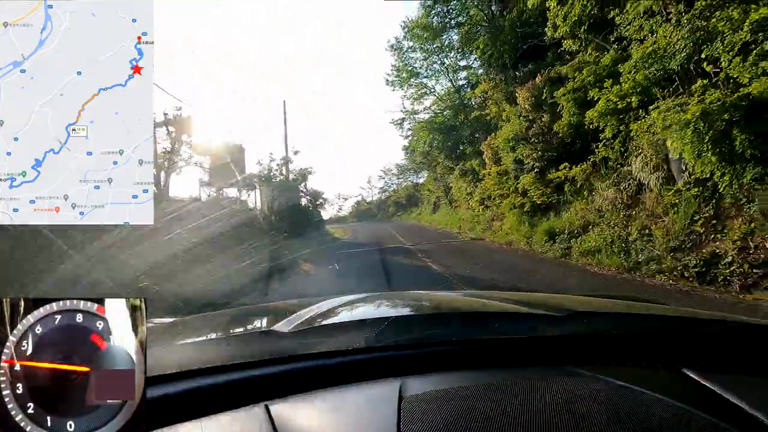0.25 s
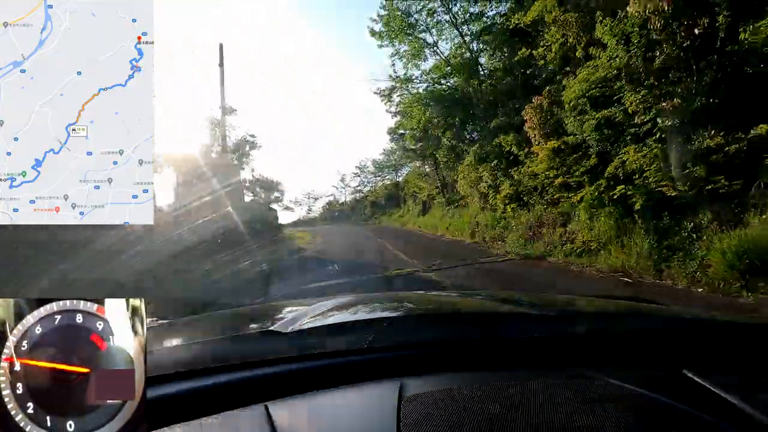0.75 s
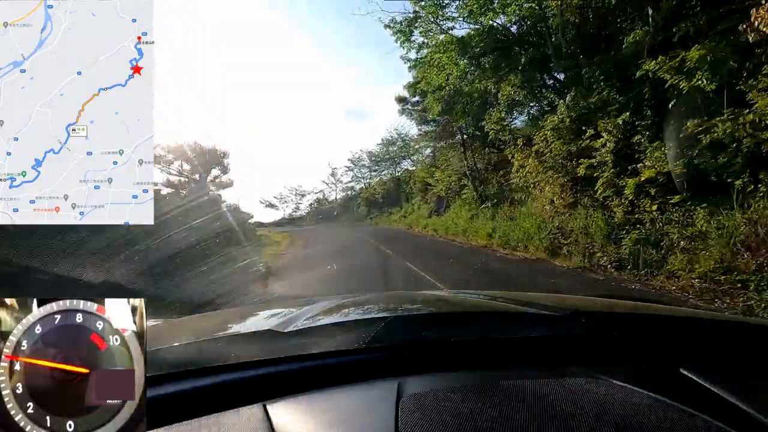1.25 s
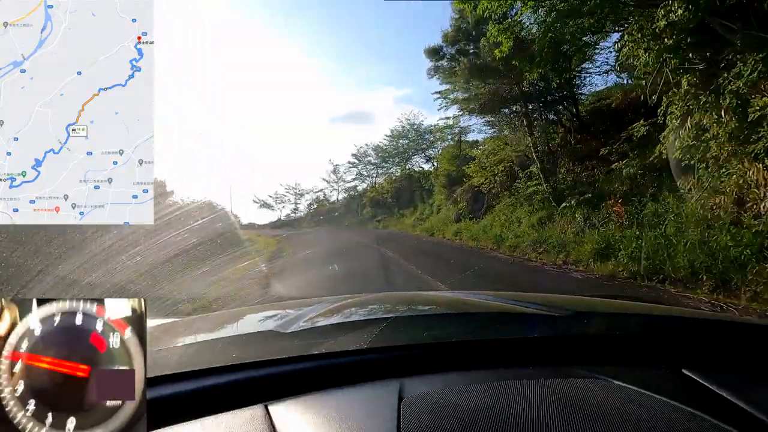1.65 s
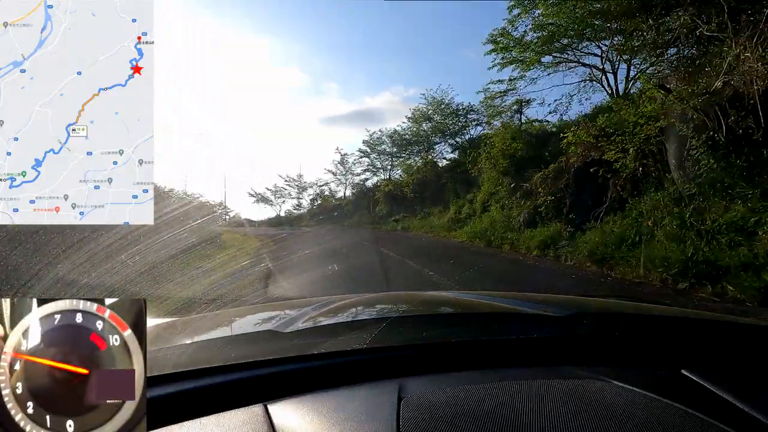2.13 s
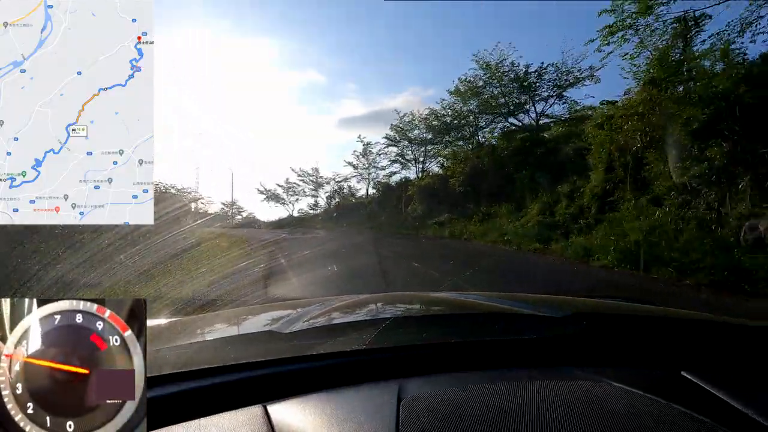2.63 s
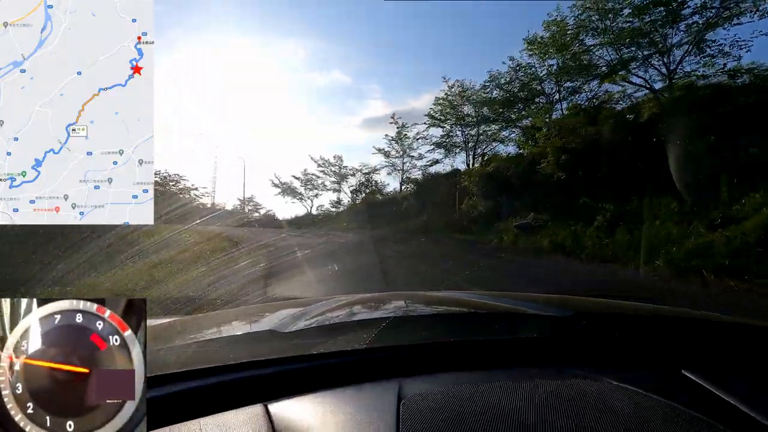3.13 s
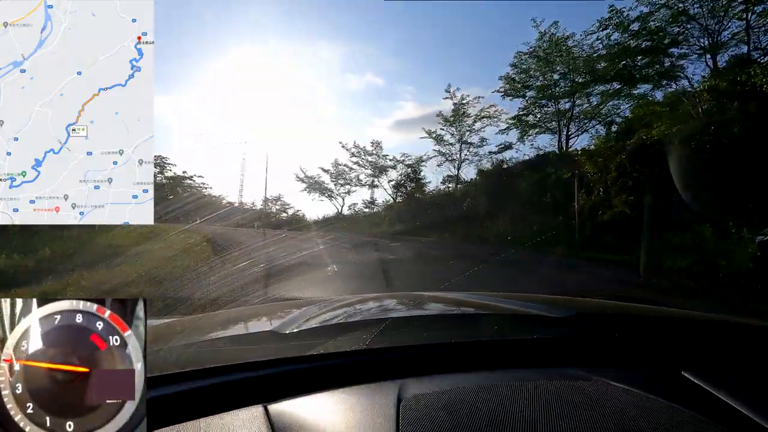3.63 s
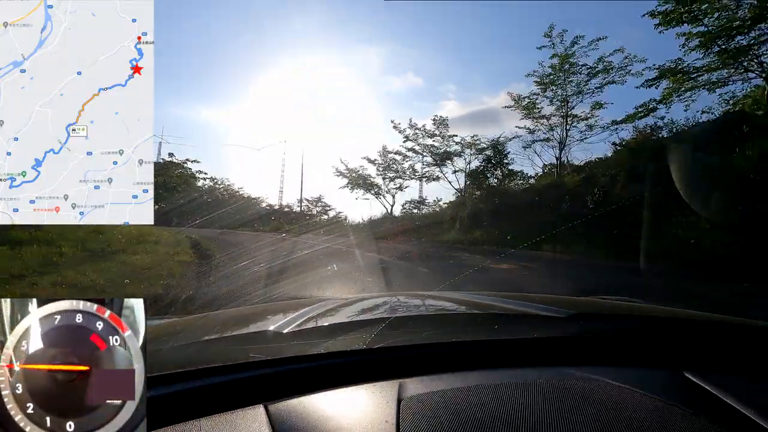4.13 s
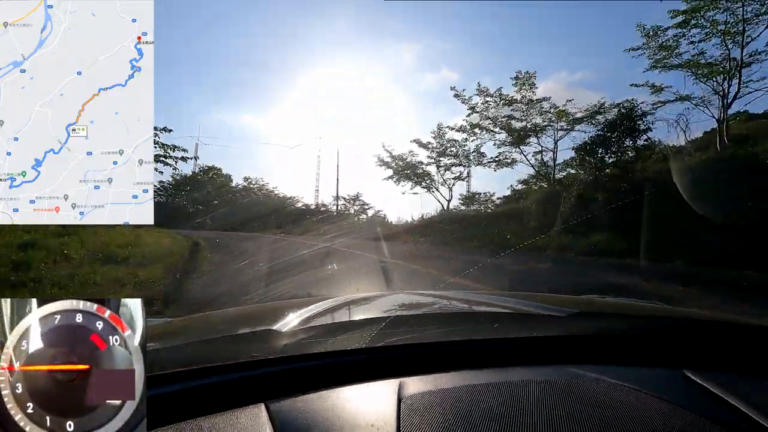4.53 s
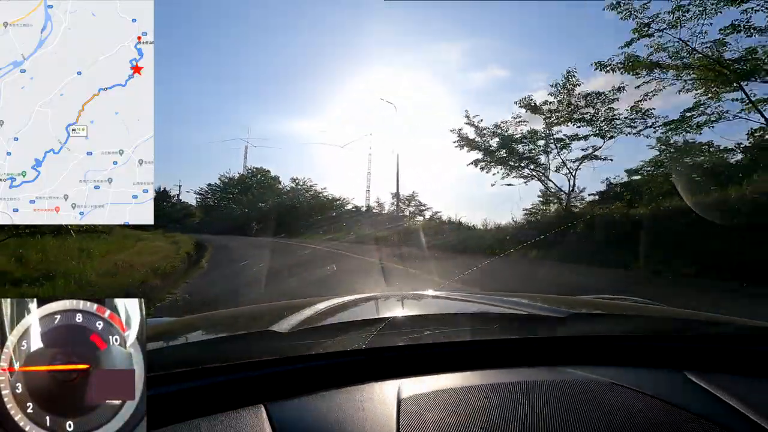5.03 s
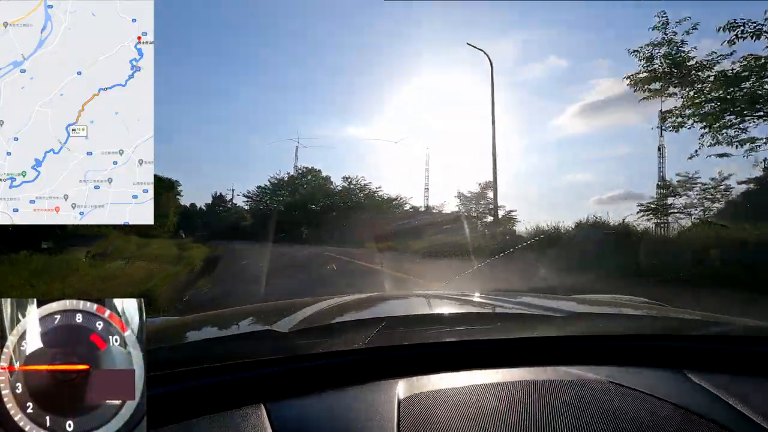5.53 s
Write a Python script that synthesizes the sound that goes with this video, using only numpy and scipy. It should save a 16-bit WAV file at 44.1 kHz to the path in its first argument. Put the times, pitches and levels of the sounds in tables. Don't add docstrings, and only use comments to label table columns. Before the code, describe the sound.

Inside a sports car on a hill road, a rotary engine drones with a buzzy edge and throbbing exhaust roar. It climbs slightly, jolts and lifts off after two seconds, booms deeply around four, then pulls again. Rumbling bumps, small trim knocks and grit ticks surround a close dashboard microphone overloaded by bass.

```python
import sys
import numpy as np
from scipy import signal
from scipy.fft import rfft, irfft, next_fast_len
from scipy.io import wavfile
from scipy.ndimage import uniform_filter1d

SR = 44100
rng = np.random.default_rng(int(sys.argv[2]) if len(sys.argv) > 2 else 0)


def output_pcm(signal):
    pcm = np.clip(np.atleast_2d(signal).T, -1, 1) * 32767
    wavfile.write(sys.argv[1], SR, np.round(pcm).astype(np.int16))


def makeup_ratio(level_db):
    decades = np.asarray(level_db, float) / 20
    return 10 ** decades


N = 254898
T = np.arange(N) / SR

# time in seconds, firing rate in Hz.
FIRING_RATE = [(0.0, 130.0), (.6, 133.9), (1.55, 139.6), (2.0, 140.2), (2.24, 139.2), (2.62, 136.3),
               (2.89, 134.8), (3.3, 133.0), (3.45, 131.4), (3.6, 128.3), (3.85, 126.0), (4.15, 122.2),
               (4.4, 119.7), (5.0, 119.6), (5.3, 121.4), (5.78, 124.0)]
# time in seconds, throttle 0-1, load on tyres and exhaust 0-1.
PEDAL = [(0.0, 0.74, 1), (.36, 1.01, 0.96), (.75, 0.83, 0.94), (1.45, 0.93, 0.96), (1.72, 0.72, 0.94),
         (2.0, 0.7, 0.53), (2.3, 0.29, 0.22), (2.4, 0.06, 0.18), (2.62, 0.24, 0.43), (3.1, 0.73, 0.67),
         (3.3, 0.38, 0.56), (3.45, 0.24, 0.43), (3.75, .4, .22), (4.25, 0, 0.16), (4.45, 0.2, 0.29),
         (4.65, 0.68, 0.68), (5.3, 0.98, 0.99), (5.78, 0.85, .95)]
# start in seconds, length in seconds, swing in Hz, period in seconds.
SHUNTS = [
    (1.612, .42, 3.6, .27),
    (4.35, 1.0, -1.6, .335),
]
# level at full throttle in dB, loss as the throttle shuts
# (factor on the throttle in dB), pipe mode in Hz, its width in Hz, its lift in dB.
FIRST_ORDER = (-12.5, 0.96, 120, 18.5, 0.5)
SECOND_ORDER = (-29.5, 0.65, 241.5, 25.5, 15.5)
FIFTH_ORDER = (-56, 0.7, 605.5, 40.5, 33.5)
# multiple of the firing rate, level pulling at high revs in dB, coasting in dB,
# pulling at low revs in dB.
UPPER_ORDERS = [(1.5, -35.5, -35, -38), (2.5, -39.5, -45.5, -31), (3, -36, -33.5, -40.5),
                (3.5, -45.5, -38.5, -50.5), (4, -37.5, -40.5, -35), (4.5, -35.5, -29.5, -52.5),
                (5.5, -35, -35.5, -48.5), (6, -34.5, -37, -34.5), (6.5, -38, -40.5, -39),
                (7, -35.5, -39, -44), (7.5, -37, -35.5, -36.5), (8, -56.5, -51, -37),
                (8.5, -42.5, -42.5, -40), (9, -44.5, -55, -50), (9.5, -34, -39.5, -39.5),
                (10, -39.5, -56, -41), (10.5, -34.5, -39.5, -34), (11, -48, -60, -43),
                (11.5, -38, -63.5, -36.5), (12, -60.5, -51.5, -36), (12.5, -65.5, -66, -40),
                (13, -63.5, -57, -45)]
# centre in seconds, length in seconds, level in dB.
BOOMS = [(.24, 0.22, -19), (0.47, 0.24, -17), (1.56, .2, -27), (2.52, 0.17, -22), (3.227, 0.34, -20),
         (3.843, 0.18, -9), (3.98, 0.46, -8.5), (4.127, 0.19, -7.5), (4.623, 0.25, -19), (5.3, 0.28, -22.5)]
# centre in seconds, length in seconds, change of
# rumble in dB, change of body boom in dB.
BUMPS = [(0.047, 0.086, 9.5, 1.5), (0.668, .2, 3.5, 2.5), (1.43, 0.29, 5, 1.5), (1.66, 0.34, 10, 3),
         (2.11, 0.22, -3, 1), (2.3, 0.81, -1, -1), (3.115, 0.067, 3.5, 2), (3.177, 0.31, 5, 2.6),
         (3.405, 0.11, 2, 6.5), (3.623, 0.12, 10, 5.5), (3.85, 0.48, 4.5, 2.5), (4.15, 0.13, 10.5, -3),
         (4.267, 0.11, -5, -4.5), (4.42, 0.11, 6, 0), (4.652, 0.088, 9.5, 3), (5.253, 0.072, 7, 4.5),
         (5.5, .12, 3, -1), (1.1, .14, 2, 1), (4.77, .12, 3, .3), (2.837, 0.18, 4.5, 2),
         (1.28, .12, 8, 1.5), (1.87, .12, -4, -6), (2.972, 0.23, 0.5, 2), (4.338, .1, 1, 3),
         (5.65, 0.29, -6, -2.5)]
# frequency in Hz, density in dB per Hz.
RUMBLE_COLOUR = [(7.1, -37.5), (12, -18), (48, 3), (65, -0.5), (87, -10), (115, -1.5), (150, -39),
                 (250, -120)]
BODY_COLOUR = [(59, -32.5), (100, 3.5), (124, -0.5), (157, -2.5), (221, -2.5), (279, -3.5), (361, -15.5),
               (408, -20.5), (520, -16), (680, -50.5), (1140, -120)]
ROAR_COLOUR = [(240, -31.5), (400, 3.5), (526, -8.5), (615, 2.5), (798, -7), (886, 1.5), (971, -1),
               (1090, -3.5), (1530, -3.5), (1900, -25.5), (2470, -47.5), (4180, -120)]
HISS_COLOUR = [(1000, -20), (1700, 1.5), (1970, 2), (2710, -3), (3300, -8), (4090, -15), (4940, -20),
               (6090, -21), (9000, -34), (11700, -61), (19800, -120)]
AIR_COLOUR = [(4710, -26), (8000, -9), (9330, -5.5), (10500, -7), (11200, -9), (13900, -13), (15100, -15.5),
              (15800, -21)]
# resonance in Hz, width in Hz, level in dB.
PANEL_MODES = [(2774, 38, -47.5), (990.3, 24, -35.5), (4010, 260, -53)]
# start in seconds, peak in dB, factor on the mode frequencies.
KNOCKS = [(0.039, -3, 1.03), (0.172, 0.5, 1.01), (0.765, -8.5, 1.3), (1.513, -12, 1.2), (2.006, -2.5, 0.93),
          (2.635, -11, 1.18), (2.988, -15, 0.89)]
# frequency in Hz, level in dB, t60 in seconds.
TRIM_MODES = [(666, -10, 0.061), (930, -2, 0.033), (1126, 0.5, 0.018), (1327, -5.5, 0.033),
              (1780, -10, 0.014), (3500, -18, .008)]
# start in seconds, peak in dB, low treble in relative dB, top treble in relative dB,
# hardness 0-1.
GRIT = [(0.0972, -40, -4, -21, 0.5), (0.15, -38, 7, -10, 0.5), (0.218, -46, 1, 3, .4),
        (0.4284, -44, 12, -18, 0.55), (0.63, -34, 2.2, -9, 0.55), (0.707, -33.5, -2, 2.5, 0.5),
        (0.8914, -36, 3, 7, 0.74), (0.9315, -16, 0, -2, 1), (1.535, -35, 15, -25.5, 0.2),
        (1.558, -25, 10, -24, 0.86), (1.5717, -29, 7, -13, 0.46), (1.5932, -33, 9, -22, 0.2),
        (1.62, -37, 5, -17, 0.3), (1.72, -33, 7, -8, 0.7), (2.672, -46.5, 11, -19, 0.6),
        (2.872, -38, 3, 0, 0.55), (2.986, -26, 2, -12, 0.85), (3.3354, -26.5, 7.5, -3, 0.67),
        (3.3494, -33, 5, -19, 0.05), (3.552, -47, 9, -4, 0.7), (3.75, -35, 5, -5, 0.8),
        (3.905, -46, 10, -13, 0.6), (4.14, -41.5, 3, -9, 0.5), (4.4497, -49, 19, -11, 0.6)]

SHAFT_DB = -30.5
UPPER_DB, UPPER_LOSS = 0.54, 0.45
SHUT_LEAK = 0.045
STUMBLE_DB = 3.5
GEAR_TEETH = 23
CASING_HZ, CASING_WIDTH_HZ, GEAR_DB = 2750, 35, -35
RUMBLE_DB, BODY_DB, ROAR_DB, HISS_DB = -17, -15, -24.5, -32
RUMBLE_RISE_DB, BODY_RISE_DB, HISS_FALL_DB = 3.7, 3.5, 10
AIR_DB, WIND_DB = -26.5, -72.5
PUFF_DEPTH = 0.36
MUFFLE = 0.66
RATTLE_SOFT_S, RATTLE_HARD_S = 0.2, 0.058


def evened(x):
    return x / np.sqrt(np.mean(x ** 2) + 1e-20)


def curves(rows):
    s, *columns = np.transpose(rows)
    return [np.interp(T, s, c) for c in columns]


def drift(hz):
    size = next_fast_len(N)
    f = np.fft.rfftfreq(size, 1 / SR)
    spectrum = rfft(rng.standard_normal(N), size)
    return evened(irfft(spectrum / (1 + (f / hz) ** 4))[:N])


def noise(colour, size, patchy_db):
    frames, hz = 4 * N // size + 6, np.fft.rfftfreq(size, 1 / SR)
    real, imaginary, patches = rng.standard_normal((frames, len(hz), 3)).T
    patches = uniform_filter1d(patches, size=8, axis=0)
    patches = evened(uniform_filter1d(patches, size=5, axis=1))
    f, db = np.transpose(colour)
    colour_db = np.interp(np.log(hz + 1), np.log(f + 1), db, left=-120, right=-120)
    spectra = (real + 1j * imaginary) * makeup_ratio(colour_db[:, None] + patchy_db * patches)
    return evened(signal.istft(spectra, nperseg=size, noverlap=3 * size // 4)[1][:N])


def band(x, lo_hz, hi_hz):
    return signal.sosfilt(signal.butter(2, [lo_hz, hi_hz], "bandpass", fs=SR, output="sos"), x)


def add(mix, s, sound):
    part = mix[round(s * SR):][:len(sound)]
    part += sound[:len(part)]


def swell(s, length):
    return np.cos(np.pi * np.clip((T - s) / max(length, 0.02), -0.5, 0.5)) ** 2


def pedal():
    return np.clip(curves(PEDAL), 0, 1.2)


def shunt():
    total = 0
    for s, length, swing_hz, period in SHUNTS:
        t = T - s
        decay = (t > 0) * np.maximum(1 - (t / length) ** 2, 0)
        total = total + swing_hz * np.sin(2 * np.pi * t / period) * decay
    return total


def order_db(hz, throttle, full_db, loss, pipe_hz, width_hz, lift_db):
    charge_db = loss * 20 * np.log10(throttle + SHUT_LEAK)
    return full_db + charge_db + lift_db / (1 + ((hz - pipe_hz) / width_hz) ** 2)


def gear_whine(hz, turns, load):
    near = 1 / (1 + ((GEAR_TEETH * hz - CASING_HZ) / CASING_WIDTH_HZ) ** 2)
    level = load * makeup_ratio(GEAR_DB + 2 * drift(16)) * near
    return level * np.cos(2 * np.pi * GEAR_TEETH * (turns + 0.0055 * drift(30)))


def engine():
    hz = curves(FIRING_RATE)[0] + shunt()
    throttle, load = pedal()
    boom = sum(makeup_ratio(db) * swell(s, length) for s, length, db in BOOMS)
    shaft_db = 20 * np.log10(makeup_ratio(SHAFT_DB) + boom)
    stumble_db = STUMBLE_DB * np.maximum(1 - throttle, 0)
    first_db = order_db(hz, throttle, *FIRST_ORDER) + stumble_db * drift(9.5)
    second_db = order_db(2 * hz, throttle, *SECOND_ORDER) + stumble_db * drift(7)
    fifth_db = order_db(5 * hz, throttle, *FIFTH_ORDER)
    upper_db = UPPER_DB + UPPER_LOSS * 20 * np.log10(throttle + SHUT_LEAK)
    turns = np.cumsum(hz * (1 + 0.00061 * drift(7.2))) / SR

    orders = [(0.5, shaft_db, 0.1), (1, first_db, 0), (2, second_db, 0.5), (5, fifth_db, 0.2)]
    high = np.clip((hz - 125) / 4, 0, 1)
    pull = np.clip(2 * throttle - 0.7, 0, 1)
    for order, high_db, coast_db, low_db in UPPER_ORDERS:
        pull_db = high * high_db + (1 - high) * low_db
        db = upper_db + pull * pull_db + (1 - pull) * coast_db
        orders.append((order, db, 0.3 * rng.random()))
    out = np.zeros(N)
    for order, db, phase in orders:
        level = np.sqrt(2) * makeup_ratio(db + 0.8 * drift(10))
        out += level * np.cos(2 * np.pi * (order * turns + phase))
    return out + gear_whine(hz, turns, load), turns


def road_rumble(slack):
    rumble_db = RUMBLE_DB + RUMBLE_RISE_DB * slack
    body_db = BODY_DB + BODY_RISE_DB * slack
    for s, length, rumble_bump_db, body_bump_db in BUMPS:
        shape = swell(s, length)
        rumble_db = rumble_db + rumble_bump_db * shape
        body_db = body_db + body_bump_db * shape
    rumble = makeup_ratio(rumble_db - 1.5) * noise(RUMBLE_COLOUR, size=4096, patchy_db=0.3)
    return rumble + makeup_ratio(body_db - 4) * noise(BODY_COLOUR, size=2048, patchy_db=0.3)


def exhaust_roar(slack, throb):
    level = makeup_ratio(ROAR_DB + 0.5 * drift(40)) * (1 + PUFF_DEPTH * throb)
    roar = level * noise(ROAR_COLOUR, size=1024, patchy_db=-0.9)
    highpass = signal.butter(2, 1050, "highpass", fs=SR, output="sos")
    return roar - MUFFLE * np.clip(slack, 0, 1) ** 2 * signal.sosfiltfilt(highpass, roar)


def air_hiss(slack, throb):
    hiss_db = HISS_DB - HISS_FALL_DB * slack
    level = makeup_ratio(hiss_db + 2 + 0.45 * drift(40)) * (1 + 0.069 * throb)
    hiss = level * noise(HISS_COLOUR, size=512, patchy_db=1.1)
    air_db = AIR_DB - 3.5 + hiss_db + 0.3 * (hiss_db + 33.5)
    return hiss + (makeup_ratio(WIND_DB) + makeup_ratio(air_db)) * noise(AIR_COLOUR, size=512, patchy_db=2.5)


def road_and_flow(turns):
    slack = 1 - pedal()[1]
    throb = evened(np.exp(1.1 * np.cos(2 * np.pi * turns)))
    throb -= throb.mean()
    return road_rumble(slack) + exhaust_roar(slack, throb) + air_hiss(slack, throb)


def panels():
    shake = rng.standard_normal(N)
    out = np.zeros(N)
    for hz, width, db in PANEL_MODES:
        hum = evened(band(shake, hz - width / 2, hz + width / 2))
        out += makeup_ratio(db + ROAR_DB + 21.5) * hum
    return out


def knocks():
    out, t = np.zeros(N), T[:4000]
    for s, db, scale in KNOCKS:
        ring = 0
        for hz, mode_db, t60 in TRIM_MODES:
            phase = 0.45 * rng.random()
            ring = ring + makeup_ratio(mode_db - 60 * t / t60) * np.sin(2 * np.pi * hz * scale * t + 2 * np.pi * phase)
        add(out, s, makeup_ratio(db - 2) * (1 - np.exp(-t / 0.0008)) * ring)
    return out


def grit():
    out, t = np.zeros(N), T[:10000]
    for s, db, low_db, top_db, hard in GRIT:
        raw = rng.standard_normal(len(t))
        burst = evened(band(raw, 3400, 8700))
        burst += makeup_ratio(low_db - 5.5) * evened(band(raw, 2780, 4520))
        burst += makeup_ratio(top_db - 4) * evened(band(raw, 10300, 13800))
        t60 = RATTLE_SOFT_S + (RATTLE_HARD_S - RATTLE_SOFT_S) * hard
        rise = 1 - np.exp(-t / (0.00025 + 0.012 * (1 - hard) ** 2))
        tick = 5.2 * hard ** 4 * np.exp(-t / 0.0015)
        shape = rise * (makeup_ratio(-60 * t / t60) + tick)
        add(out, s, makeup_ratio(db - 5.5) * shape / shape.max() * burst)
    return out


def scene():
    orders, turns = engine()
    return (orders + road_and_flow(turns) + panels() + knocks() + grit())[None]


def low_pass(x):
    return signal.sosfilt(signal.butter(12, 16470, fs=SR, output="sos"), x)


def record(dry):
    power_db = 10 * np.log10(uniform_filter1d(dry ** 2, size=1800, axis=1) + 1e-12)
    excess_db = uniform_filter1d(np.maximum(power_db + 7.5, 0), size=1200, axis=1)
    clipped = np.clip(dry * makeup_ratio(-0.4 * excess_db), -1.03, 1.03)
    notch = signal.iirnotch(10400, 18, SR)
    heard = 0.5 * signal.lfilter(*notch, clipped) + 0.5 * clipped
    lowpass = signal.firwin(801, 15820, window=("kaiser", 8), fs=SR)
    mix = signal.oaconvolve(heard, lowpass[None], "same")
    return low_pass(mix)


dry = scene()
out = record(dry)
output_pcm(out)
```